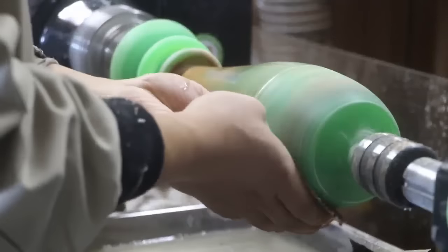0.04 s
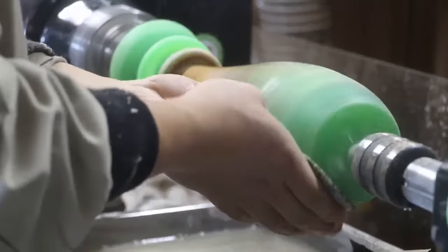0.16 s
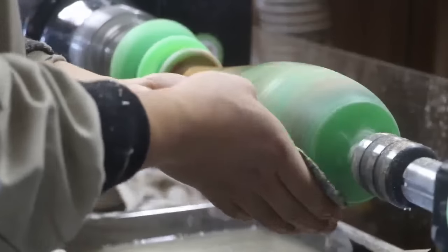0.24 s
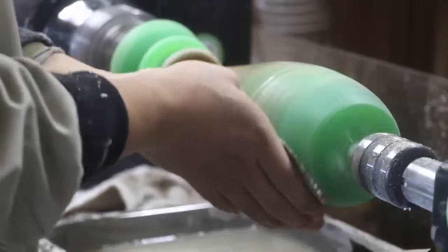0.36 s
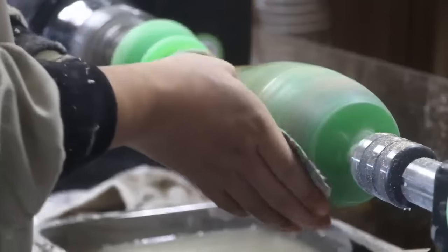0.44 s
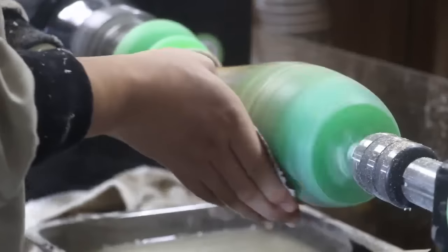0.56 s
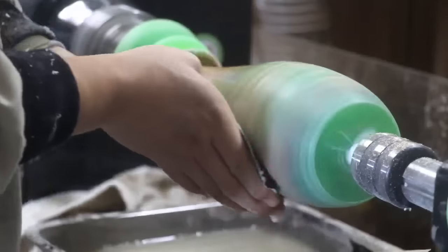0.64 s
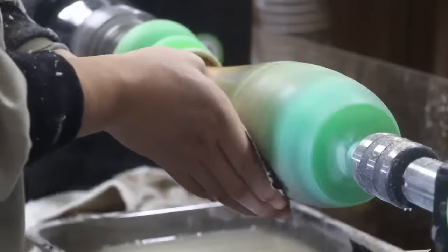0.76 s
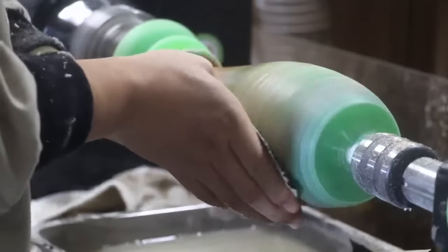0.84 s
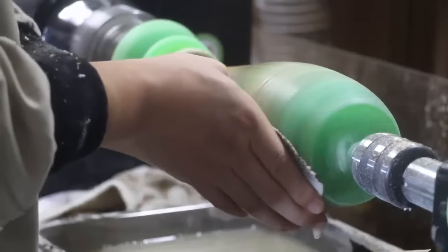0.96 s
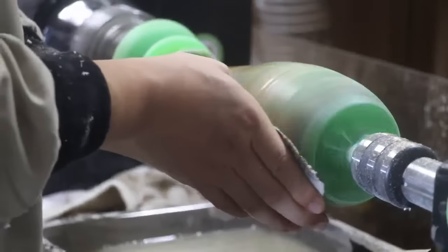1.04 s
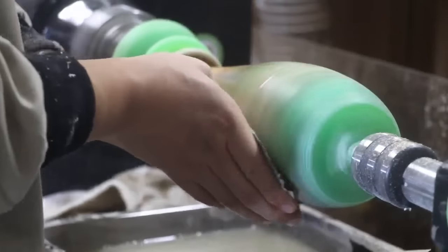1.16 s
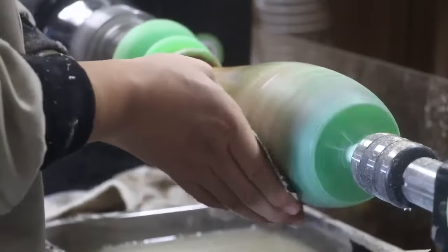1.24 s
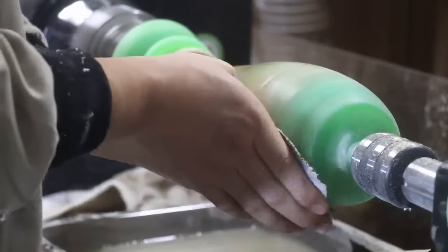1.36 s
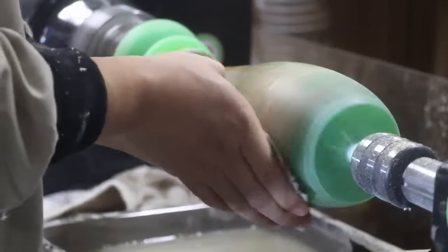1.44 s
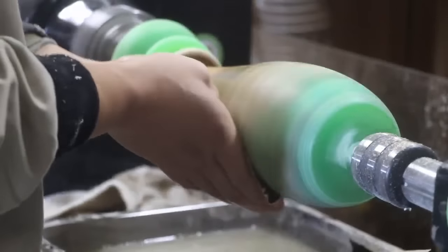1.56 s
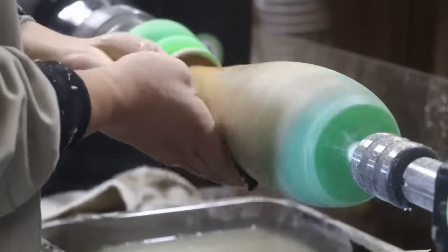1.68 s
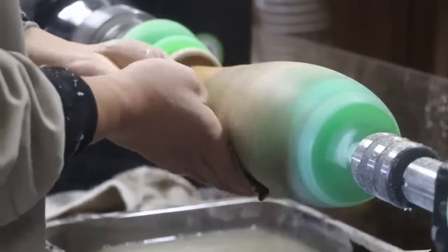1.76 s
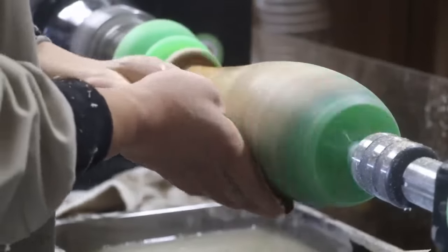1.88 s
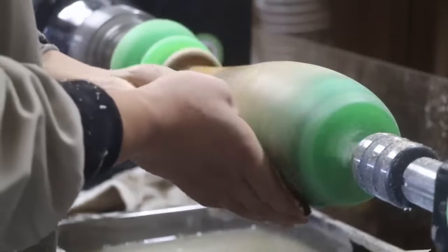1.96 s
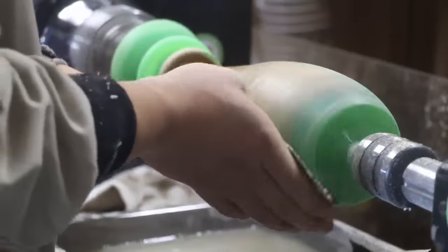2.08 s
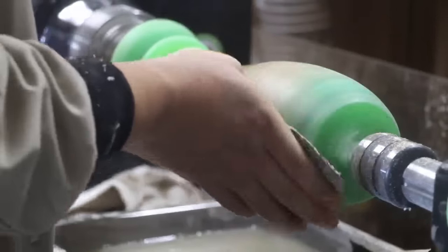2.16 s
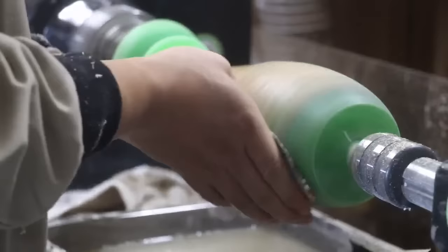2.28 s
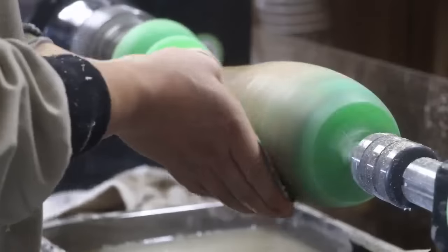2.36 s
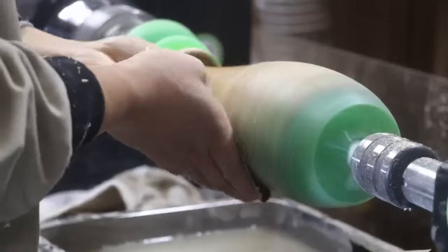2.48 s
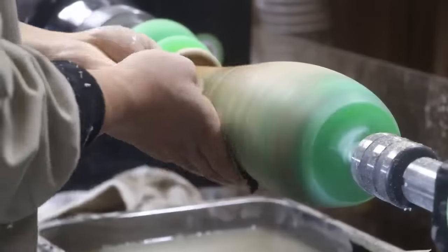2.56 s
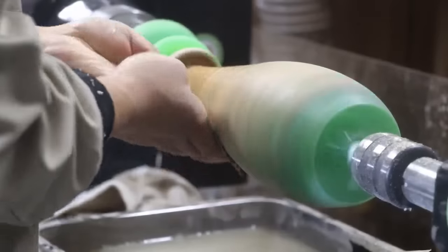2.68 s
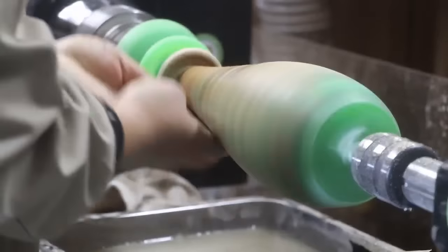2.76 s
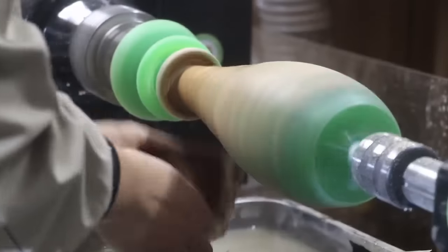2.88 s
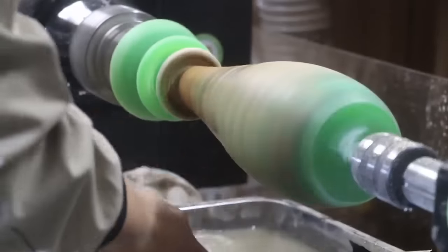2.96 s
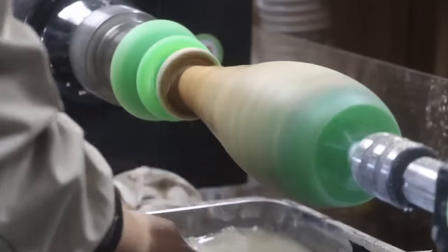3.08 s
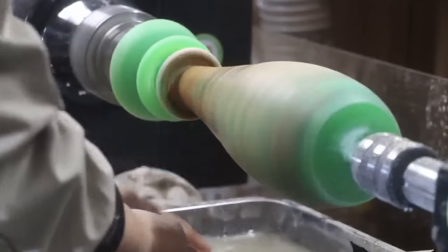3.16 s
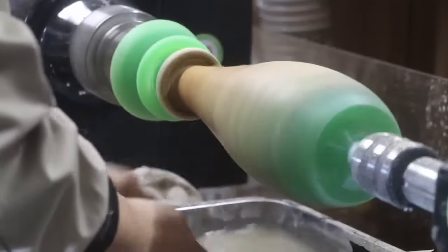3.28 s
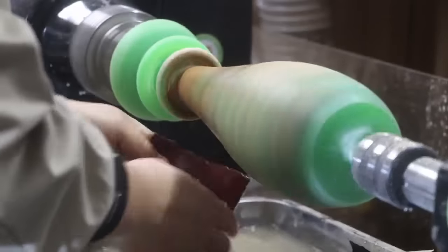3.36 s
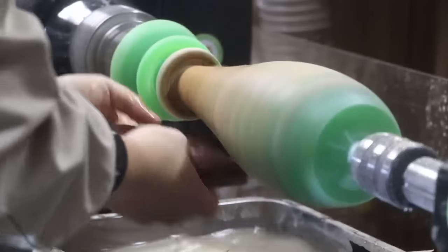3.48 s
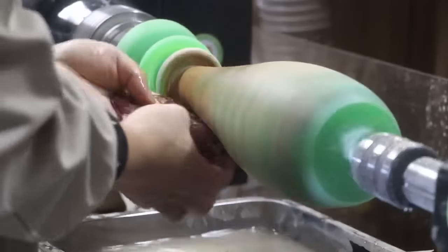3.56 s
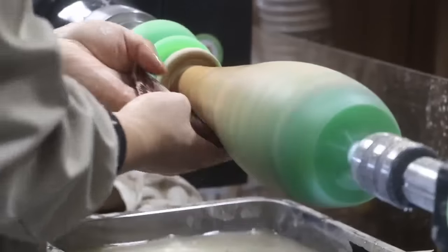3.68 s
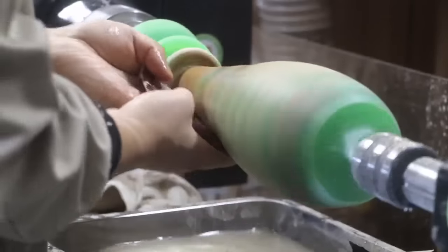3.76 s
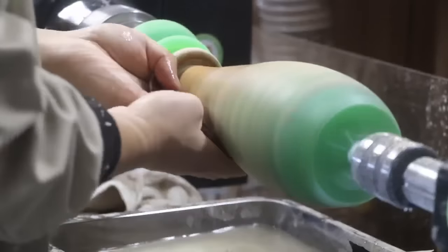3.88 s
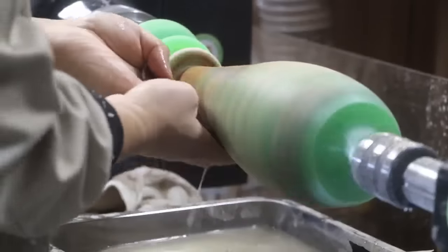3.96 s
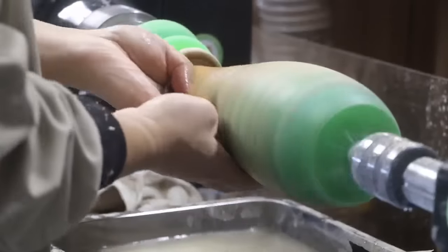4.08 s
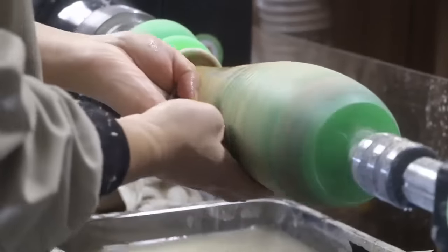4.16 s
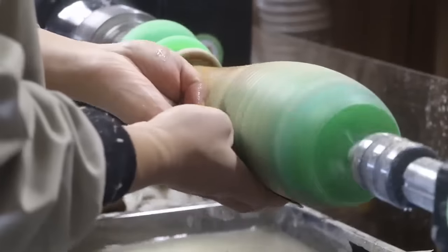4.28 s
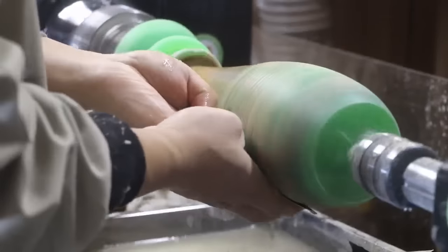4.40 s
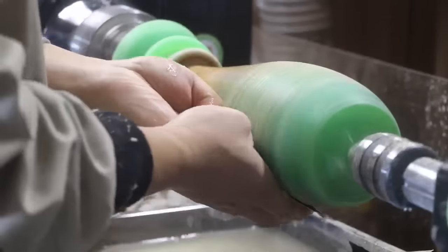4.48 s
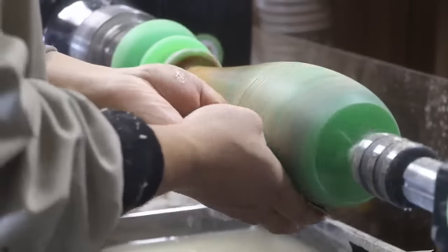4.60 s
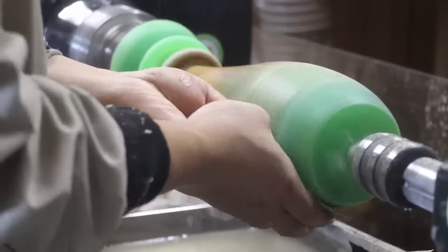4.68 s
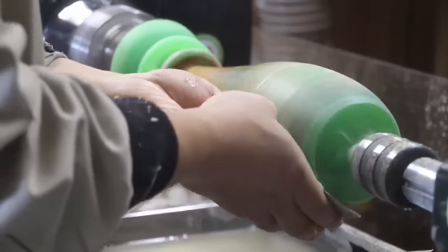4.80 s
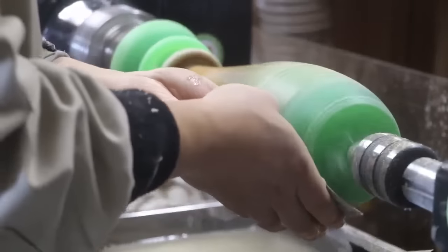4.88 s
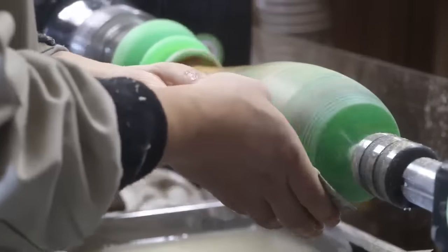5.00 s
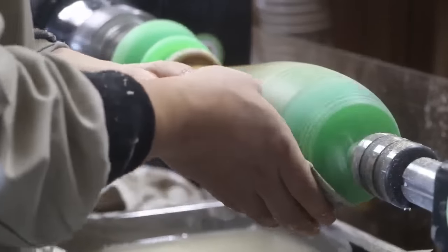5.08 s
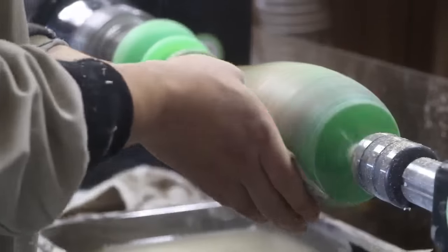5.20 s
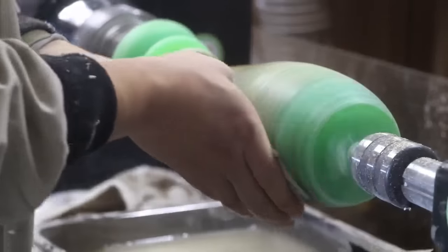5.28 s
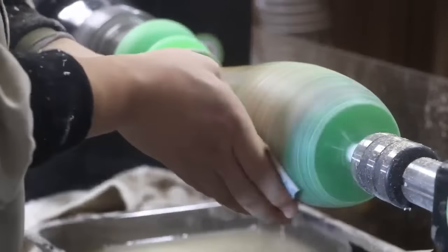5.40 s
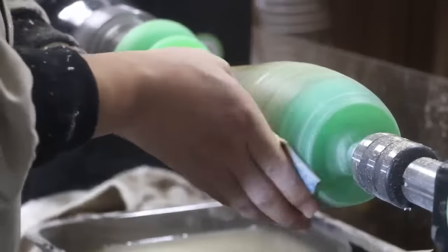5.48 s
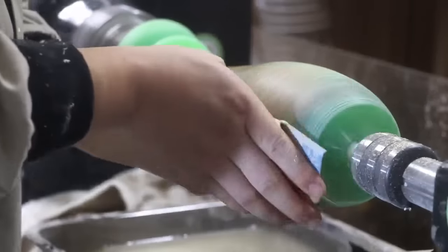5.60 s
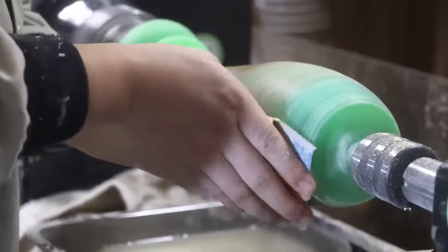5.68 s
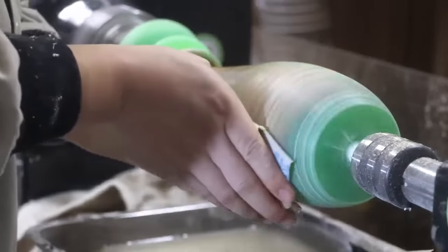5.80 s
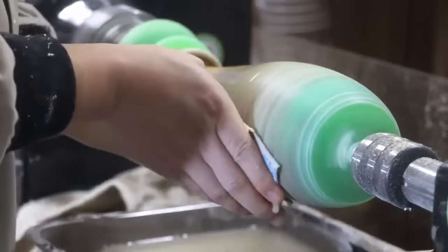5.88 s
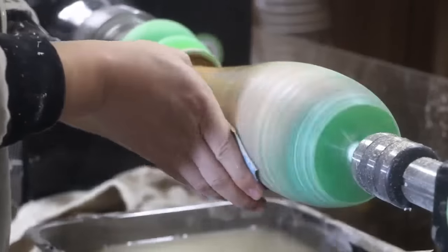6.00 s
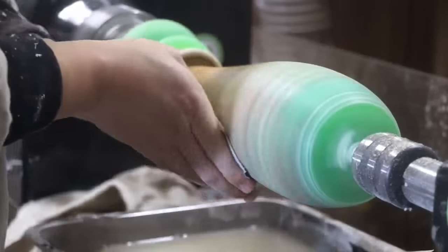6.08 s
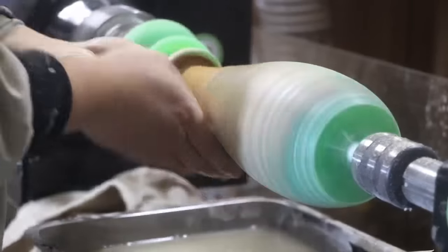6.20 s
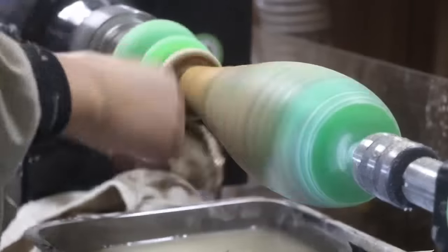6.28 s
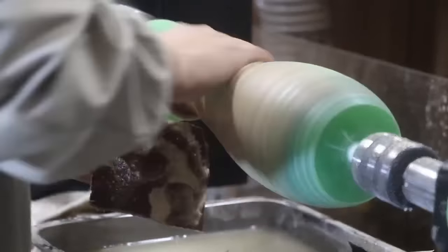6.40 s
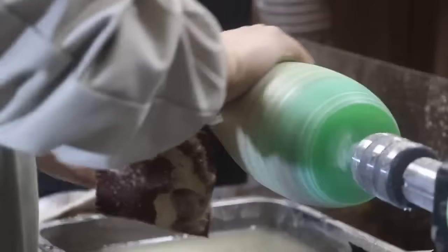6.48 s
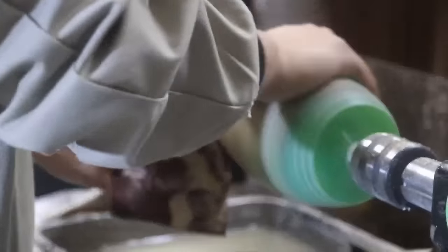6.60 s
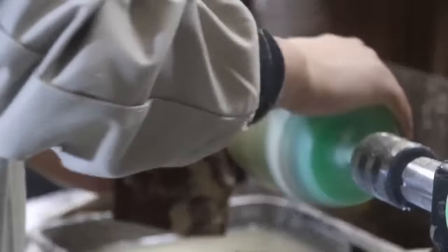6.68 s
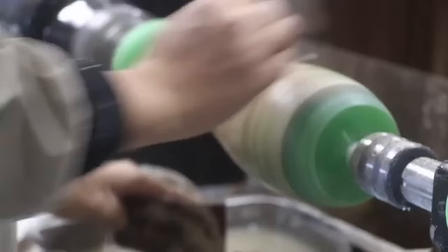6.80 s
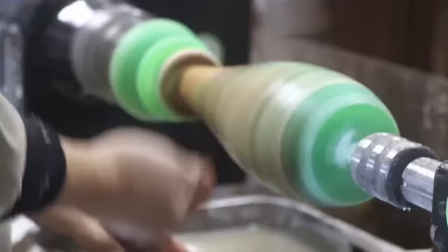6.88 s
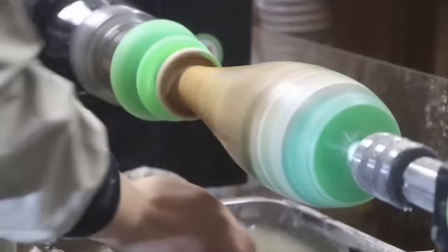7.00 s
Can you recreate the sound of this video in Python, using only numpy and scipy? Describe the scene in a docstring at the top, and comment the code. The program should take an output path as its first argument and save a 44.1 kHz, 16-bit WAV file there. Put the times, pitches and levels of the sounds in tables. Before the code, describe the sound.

A lathe hums and whirrs faintly while wet abrasive paper scrapes a rotating vase, close to the microphones. The bright, nasal hiss wavers with hand pressure and rotation, broken by gritty rasps, a sharp snap and hoarse little squeals. It drops suddenly to near quiet with watery swishing and a squeak, resumes darker for a second long stroke, and ends with a much softer palm slide. Short workshop reflections follow the snaps and squeaks.

```python
"""Wet sandpaper is pressed against a spinning vase of wood and resin: grit hisses and bites (filtered grains),
the paper rings and snaps (resonances, bursts) and squeals (sinking tones) under the cupped hand. The paper
lifts, and the wet surface swishes (granular noise), squeaks and ticks (bursts); then a second stroke follows.
At the end a bare palm wipes the piece (granular noise). Throughout, the lathe hums in mains harmonics, rumbles
and whirrs in shaped noise; thin steady tones sound during the strokes, and low flutter comes in spells."""
import sys
import numpy as np
from scipy import signal
from scipy.fft import rfft, irfft
from scipy.io import wavfile

SR = 44100
rng = np.random.default_rng(int(sys.argv[2]) if len(sys.argv) > 2 else 0)


def unload_wav(signal):
    """Save mono or channel-first audio to the path in sys.argv[1] as 16-bit WAV at rate SR, clipped to [-1, 1]."""
    wavfile.write(
        sys.argv[1],
        SR,
        np.round(np.clip(np.atleast_2d(signal).T, -1, 1) * 32767).astype(np.int16),
    )


N = 310905
T = np.arange(N) / SR
MAINS_HZ = 50
TOUCH_S = 0.005  # time constant with which the strokes' sounds come and go

# paper pressed on the piece: (start [s], end [s], rotation [turns/s], first meeting with the high spot [s])
STROKE_TIMES = [(0.0, 2.856, 11.24, .041), (3.633, 6.356, 11.14, 3.666)]
# the hand at work, one curve a stroke:
# (time [s], pressure as relative hiss level [dB], relative paper ring level [dB], paper resonance [Hz])
HAND_CURVES = [
    [(0.0, -38.5, -31.5, 2030), (0.36, -39.5, -36.5, 1910), (0.58, -39, -35, 2040),
     (0.68, -41.5, -35, 2200), (0.88, -40, -33, 1920), (1.0, -39.5, -44, 2150), (1.14, -40.5, -47, 2170),
     (1.42, -40.5, -40, 2080), (1.51, -40, -37.5, 2130.0), (1.63, -37, -30, 2160), (1.85, -37, -34, 2120),
     (2.02, -41.0, -36.5, 2190.0), (2.12, -42.5, -44.5, 2100.0), (2.3, -39.5, -40, 2110),
     (2.5, -41.5, -31.5, 2160), (2.6, -38.5, -27, 2210), (2.7, -39, -36.5, 2080),
     (2.86, -40.5, -33.5, 2150.0)],
    [(3.63, -37.5, -37, 1800.0), (3.765, -39, -50, 1550), (3.795, -37, -38, 1710), (4.25, -38.0, -37, 1580),
     (4.45, -37.5, -35, 2180), (4.66, -40.5, -35.5, 1520), (4.82, -35.5, -35.5, 1680),
     (4.88, -42, -45, 1700), (4.96, -37.5, -35, 1630), (5.11, -40.0, -41, 1960), (5.44, -39.5, -34.5, 1490),
     (5.63, -41, -33, 1870), (5.74, -40.5, -51, 1880.0), (6.15, -38.5, -27.5, 1910), (6.36, -39, -35, 2000)],
]
# the hand cupping the paper, one curve a stroke: (time [s], lowest radiated frequency [Hz],
# upper resonance relative to pressure [dB], level of the shaken wood [dB], upper resonance [Hz])
CUP_CURVES = [
    [(0, 1660, -4.5, -52.5, 2660), (.9, 1670, -1, -53.5, 3200), (1.4, 1580, -5.5, -52.5, 3270),
     (1.75, 1660, 4.5, -52, 3100), (2.28, 1790, -4.5, -59, 3220), (2.6, 1650, 6, -57, 3050),
     (2.86, 1740, 0, -59.5, 2920)],
    [(3.63, 1470, 0.5, -55.5, 3060), (3.95, 1630, 1, -58.5, 3300), (4.35, 1560, -4, -55, 2950),
     (4.85, 1415, -22, -50.5, 3000), (5.4, 1440, 0, -50.5, 3000), (5.85, 1450, -1.5, -51.5, 2930),
     (6.18, 1030, 7, -48, 3130), (6.36, 1530, 0, -52, 2970)],
]
# spectrum of the scraping grit: (frequency [Hz], relative density [dB/Hz])
GRIT_SPECTRUM = [(1500, 1.5), (2500, 0), (3150, -3), (3700, -1), (4200, -3.5), (4700, -3.5), (5300, -3),
                 (5900, -3), (6500, -4.5), (7300, -10.5), (8000, -21), (8700, -23), (9400, -32),
                 (10000, -63)]


def sanding(width_hz=480, upper_width_hz=540, sing_gain=.8, sing_width_hz=80, skirt=14, leak_db=-24,
            hiss_db=4.5, ring_db=-3.5, upper_db=-0.5, frame=512):
    """Source-filter principle: scraping grains excite the paper's modes, and the cupped hand high-passes them."""
    grit = through_vase(pair(grains(7000, 2.44, 0.73)))
    flutter = through_vase(pair(grains(2400, 0.98, 0.99)))
    # coarse grains break loose with sharp ticks, about 70 a second
    grit = grit + .2 * grains(70, 1.2, 0)[0] * amp([[-2], [2]])
    out = np.zeros((2, N))
    for (start, end, turn_hz, high_spot), hand, cup in zip(STROKE_TIMES, HAND_CURVES, CUP_CURVES):
        grip = chatter(turn_hz, high_spot)
        hz, t, scrape = signal.stft(grit * grip, SR, nperseg=frame)
        slaps = signal.stft(flutter * grip, SR, nperseg=frame)[2]
        f = hz[:, None] + 1
        pressure_db = follow(hand, t, axis=1)
        paper_hz = follow(hand, t, axis=3)
        # the gap under the hand lets out mainly sound above its own pitch
        leak = amp(leak_db) * f / (f + 300)
        radiated = leak + 1 / np.sqrt(1 + (follow(cup, t, axis=1) / f) ** skirt)
        hiss = levelled(amp(read(GRIT_SPECTRUM, f)) * radiated, pressure_db + hiss_db)
        # the tightest patch of paper sings, narrowly and unsteadily, inside the broad mode
        drift = 1 + .012 * np.interp(t, T, wander(6))
        lower = hump(f, paper_hz, width_hz) + sing_gain * hump(f, paper_hz * drift, sing_width_hz)
        lower = levelled(lower * radiated, ring_db + follow(hand, t, axis=2))
        upper = hump(f, follow(cup, t, axis=4), upper_width_hz)
        upper = levelled(upper, pressure_db + upper_db + follow(cup, t, axis=2))
        spectrum = scrape * hiss + slaps * np.hypot(lower, upper)
        stroke = signal.istft(spectrum, SR, nperseg=frame)[1][:, :N]
        out += stroke * contact(start, end, TOUCH_S, TOUCH_S)
    return out


# short rasps as the grit bites in: (start [s], end [s], jump of the grip before evening [dB])
BITE_TIMES = [(0.113, 0.184, 2), (0.308, 0.32, 2.5), (0.487, 0.502, 4), (0.634, 0.665, 4.5),
              (0.798, 0.844, 3), (1.012, 1.017, 5.5), (1.054, 1.082, 2.5), (1.189, 1.243, 3.5),
              (1.366, 1.446, 4), (2.063, 2.167, 4.5), (2.574, 2.64, 1), (2.748, 2.776, 2.5),
              (3.64, 3.667, 2), (3.789, 3.857, 1.5), (3.955, 3.976, 1.5), (4.558, 4.571, 2),
              (4.64, 4.662, 3), (5.094, 5.152, 3), (5.273, 5.323, 3.5), (5.532, 5.564, 4),
              (5.638, 5.642, 4.5), (5.831, 5.875, 3), (5.981, 6.015, 2.5), (6.313, 6.32, 2.5)]


def chatter(turn_hz, high_spot, turn_db=0.47, hand_db=0.44, hand_hz=30, ripple_db=-0.14,
            bite_rise_s=0.0058, bite_fall_s=0.023):
    """Amplitude modulation: the grip swells once a turn, bites, trembles with the hand, ripples with the motor."""
    turn = np.cos(2 * np.pi * turn_hz * (T - high_spot))
    bites = sum(db * contact(start, end, bite_rise_s, bite_fall_s) for start, end, db in BITE_TIMES)
    ripple = np.sin(2 * np.pi * MAINS_HZ * T)
    tremble = hand_db * wander(hand_hz)
    return evened(amp(turn_db * turn + bites + tremble + ripple_db * ripple))


# modes of the vase and notches between them: (frequency [Hz], width [Hz], boost or cut [dB])
VASE_MODES = [(1197, 64, 7), (1430, 54, 4.5), (1700, 78, 1.5), (1930, 45, 1.5), (2070, 40, 0.5),
              (2265, 41, 2.5), (2340, 37, 1), (2840, 60, 1.5), (2920, 50, 1), (3120, 40, -2.5),
              (3240, 50, 2.5), (3400, 84, 1), (3930, 64, 3), (4230, 70, 5), (5880, 170, 3), (6270, 90, 1)]


def through_vase(x, size=4096):
    """Modal resonance: the vase's own narrow modes stand out of whatever rubs on it."""
    f = np.fft.rfftfreq(size, 1 / SR)
    gain = amp(sum(db * hump(f, hz, width) for hz, width, db in VASE_MODES))
    fine_gain = np.interp(np.fft.rfftfreq(N, 1 / SR), f, gain)
    return evened(irfft(rfft(x) * fine_gain, N))


# spectrum of the shaken wood: (frequency [Hz], relative density [dB/Hz])
WOOD_SPECTRUM = [(50, -51.5), (85, -23), (150, -3.5), (220, -3.5), (420, 0), (560, -1.5), (780, 3),
                 (1100, -1), (2000, -30)]


def workpiece(release_s=0.003):
    """Structure-borne sound: the drag of the paper shakes the wood itself, a dull rush under the hiss."""
    level = sum(amp(follow(cup, T, axis=3)) * contact(start, end, TOUCH_S, release_s)
                for (start, end, *_), cup in zip(STROKE_TIMES, CUP_CURVES))
    return pair(colour(noise(), WOOD_SPECTRUM), left_db=0.9) * level


# sinking stick-slip tones of the paper: (start [s], end [s], nominal level [dB], starting pitch [Hz])
SQUEAL_TONES = [(0.658, 0.758, -40.5, 2175), (0.803, 0.849, -35, 2013), (.918, 0.953, -41, 1886),
                (3.708, 3.76, -39, 1438), (3.789, 3.86, -41.5, 1793), (3.997, 4.038, -37.5, 1720),
                (4.655, 4.675, -38, 1650), (4.786, 4.812, -40, 1422), (5.1, 5.148, -39, 1893)]


def squeals(sag_per_s=.5, waver=0.026, waver_hz=170, rough_db=3.5, edge_s=0.004, left_db=-6.5):
    """Stick-slip oscillation: the wet paper grabs and lets go in a hoarse, narrow tone that sinks as it lasts."""
    unsteady, out = 1 + waver * wander(waver_hz), 0
    for start, end, db, hz in SQUEAL_TONES:
        sag = 1 - sag_per_s * (np.clip(T, start, end) - start)
        phase = 2 * np.pi * np.cumsum(hz * unsteady * sag) / SR
        out = out + amp(db) * contact(start, end, edge_s, edge_s) * np.sqrt(2) * np.sin(phase)
    roughness = evened(amp(rough_db * wander(waver_hz)))
    return out * roughness * amp([[left_db / 2], [-left_db / 2]])


# the paper catches and snaps: (time [s], nominal peak level [dB], pitch [Hz], length [s])
PAPER_SNAPS = [(.4928, -27, 2020, 0.0028), (.6322, -24.5, 2250, .0035), (.6508, -27, 2050, .003),
               (.6526, -14.7, 2270, .0024), (2.5391, -34, 2270, .002), (3.645, -27, 2285, 0.014),
               (5.5334, -27, 1730, 0.0042), (5.6327, -27, 1800, 0.0047), (6.162, -24, 1310, 0.0043),
               (6.318, -25, 1790, 0.0085)]
# wet squeaks, and a sharp tick at 3.44 s, between the strokes: (time [s], nominal peak level [dB], pitch [Hz],
# length [s])
WET_SQUEAKS_AND_TICK = [(3.1062, -45, 1720, 0.0073), (3.1110, -27.5, 2050, 0.0033), (3.112, -35, 1706, .007),
                        (3.1175, -38, 2200, 0.0059), (3.1222, -33, 1940, 0.0041), (3.4396, -48, 3730, 0.0067),
                        (3.4396, -37.5, 2960, 0.0053), (3.4414, -39, 1800, 0.00033), (3.4412, -48, 4460, 0.00034),
                        (3.4595, -46, 2900, 0.0044), (3.475, -53, 2980, 0.0069)]


def slips(rows, left_db, rasp, room_db, t60):
    """Transient stick-slip: short bursts with uneven cycles, followed by the decaying ring of the workshop."""
    dry, jitter = np.zeros(N), rasp * wander(550)
    for s, db, hz, length in rows:
        u = np.clip(2 * (T - s) / length, 0, 10)
        envelope = u ** 2 * np.exp(1 - u ** 2)
        dry += amp(db) * envelope * np.sin(2 * np.pi * hz * (T - s) + jitter)
    # so small a patch radiates little bass
    dry = signal.sosfilt(signal.butter(4, 1150, "high", fs=SR, output="sos"), dry)
    tail = noise(channels=2)[:, :SR // 2] * amp(-60 * T[:SR // 2] / t60)
    room = signal.fftconvolve(dry[None], tail / np.linalg.norm(tail[0]), axes=1)[:, :N]
    return (dry + amp(room_db) * room) * amp([[left_db / 2], [-left_db / 2]])


# water swishing while the paper is off: (start [s], end [s], relative level before sagging [dB])
SWISH_TIMES = [(2.86, 2.895, -48.5), (3.11, 3.265, -48), (3.33, 3.39, -63), (3.42, 3.49, -51.5),
               (3.61, 3.63, -52)]
# spectrum of the swishing water film: (frequency [Hz], relative density [dB/Hz])
FILM_SPECTRUM = [(88, -44), (150, -20.5), (272, -12.5), (900, -15.5), (1800, -9.5), (2200, -5), (2480, -8),
                 (3400, -9), (5500, -20), (6500, -20.5), (9810, -50)]
# the palm sliding on the wet piece: (start [s], end [s], relative level before sagging [dB])
WIPE_TIMES = [(6.37, 6.52, -66), (6.56, 6.835, -51.5), (6.97, 7.05, -62)]
# spectrum of the sliding palm: (frequency [Hz], relative density [dB/Hz])
PALM_SPECTRUM = [(71, -29), (120, -7), (220, -12.5), (400, -11), (900, -12.5), (1600, -8), (3100, -8.5),
                 (4050, -11), (4520, -14), (5900, -10.5), (7310, -19), (9810, -44)]


def wet_rub(rows, spectrum, level_db, left_db, rough_db, rise_s, fall_s, sag_db_per_s):
    """Granular friction noise: water dragged over the surface swells, sags as the film thins, and fades."""
    fizz = pair(colour(grains(6000, 1.1, 1.3), spectrum), left_db)
    fizz = fizz * evened(amp(rough_db * wander(150)))
    power = 0
    for start, end, db in rows:
        sag_db = sag_db_per_s * (np.clip(T, start, end) - start)
        power = power + (amp(level_db + db - sag_db) * contact(start, end, rise_s, fall_s)) ** 2
    return fizz * np.sqrt(power)


# hum, mostly stronger during the strokes and fainter between them:
# (frequency [Hz], nominal rms during strokes [dB], nominal rms between strokes [dB])
HUM_LINES = [(100, -83, -88), (200, -78, -84), (250, -73, -80), (300, -80, -81), (400, -72, -85),
             (900, -73, -85), (1000, -75, -85), (1500, -79, -81)]
# shaking of the lathe bed: (time [s], relative level [dB])
RUMBLE_CURVE = [(0, -68), (1.8, -64.5), (2.3, -72.5), (3.92, -77), (4.01, -60), (4.8, -55), (5.33, -60),
                (5.5, -65.5), (5.8, -61), (6.33, -52.5), (6.38, -64), (6.48, -65), (6.54, -60), (6.82, -57),
                (6.86, -63)]
# spectrum of the bed's rumble: (frequency [Hz], relative density [dB/Hz])
BED_SPECTRUM = [(20, -15), (40, -12.5), (52, -4.5), (65, -7), (85, -6.5), (100, -8.5), (118, -8.5),
                (200, -19), (500, -57)]
# spectrum of the bearings' whirr: (frequency [Hz], relative density [dB/Hz])
WHIRR_SPECTRUM = [(25, -1.5), (60, 0), (250, -1), (600, 1.5), (720, 4), (785, 1), (860, -4.5), (1500, 0),
                  (3300, -5), (6000, -12), (8000, -34), (10000, -65)]


def lathe(rumble_db=-9.0, drone_db=-11, drone_hz=100, waver_db=1.5, edge_s=0.012, whirr_db=-64.5):
    """Harmonic and broadband machine noise: mains hum, the bed's rumble and drone, the bearings' whirr."""
    in_stroke = sum(contact(start, end, edge_s, edge_s) for start, end, *_ in STROKE_TIMES)
    shake = amp(follow(RUMBLE_CURVE, T))
    hum = 0
    for hz, during_db, between_db in HUM_LINES:
        # the hum line next to the bed's resonance swells with its shaking
        drone = amp(drone_db) * shake * (abs(hz - drone_hz) < MAINS_HZ / 2)
        level = amp(between_db + (during_db - between_db) * in_stroke)
        hum = hum + (level + drone) * mains_tone(hz)
    rumble = amp(rumble_db) * shake * pair(colour(noise(), BED_SPECTRUM), apart_db=3.5)
    whirr = pair(colour(noise(), WHIRR_SPECTRUM), left_db=0.5, apart_db=-10.0) * amp(whirr_db)
    return hum * amp(waver_db * wander(2.0)) + rumble + whirr


def mains_tone(hz):
    """Harmonic locking: a tone with an rms of one at the nearest multiple of the mains frequency."""
    locked_hz = MAINS_HZ * round(hz / MAINS_HZ)
    return np.sqrt(2) * np.sin(2 * np.pi * (locked_hz * T + rng.random()))


# thin steady tones heard during the sanding strokes: (frequency [Hz], nominal rms [dB])
THIN_TONES = [(784, -71.5), (1265, -63.5), (5599, -64), (6000, -64.5), (6551, -67), (7984, -80.5),
              (8017, -80.5)]


def whine(waver_db=-2.0):
    """Sum of pure tones: thin, steady pitches with a slowly wavering level, heard during the strokes."""
    in_stroke = sum(contact(start, end, TOUCH_S, TOUCH_S) for start, end, *_ in STROKE_TIMES)
    tones = sum(amp(db) * np.sqrt(2) * np.sin(2 * np.pi * hz * T) for hz, db in THIN_TONES)
    return in_stroke * amp(waver_db * wander(2)) * tones


# spells of low flutter: (start [s], end [s], level [dB])
FLUTTER_SPELLS = [(4.01, 4.07, -69), (4.76, 4.9, -62), (5.83, 6.348, -58)]


def buffet(centre_hz=80, width_hz=16, swell_s=.03):
    """Antiphase narrow-band noise: a low flutter in spells, of opposite sign in the two channels."""
    f = np.fft.rfftfreq(N, 1 / SR)
    flutter = evened(irfft(rfft(rng.standard_normal(N)) * hump(f, centre_hz, width_hz), N))
    level = sum(amp(db) * contact(start, end, swell_s, swell_s) for start, end, db in FLUTTER_SPELLS)
    return np.outer([1, -1], flutter * level)


# likeness of the two microphones: (frequency [Hz], shared fraction of the power [0-1])
LIKENESS = [(60, 0.5), (200, 0.52), (400, 0.62), (1000, 0.6), (2000, 0.39), (4000, 0.38), (9000, 0.41)]
# balance of the two microphones: (frequency [Hz], left minus right before any source's own shift [dB])
BALANCE = [(60, -3.5), (140, -0.5), (320, -1.5), (750, -3), (1740, -7.5), (4030, -6.5), (9360, -5)]


def pair(three, left_db=0, apart_db=0):
    """Partial coherence: mixes one shared and two separate signals into two microphones."""
    hz = np.fft.rfftfreq(N, 1 / SR)
    z, same = rfft(three), np.clip(read(LIKENESS, hz), 0, 1)
    lean = amp(np.outer([.5, -.5], read(BALANCE, hz) + left_db))
    both = (np.sqrt(same) * z[0] + amp(apart_db) * np.sqrt(1 - same) * z[1:]) * lean
    return irfft(both / np.sqrt(((lean ** 2).sum(0) + 2 * same) / 4), N)


def grains(per_s, spread_db, smooth, channels=3):
    """Shot noise: random tiny impacts of uneven size over a bed of smooth noise."""
    size = amp(spread_db * np.minimum(rng.exponential(1, (channels, N)), 4))
    hits = size * np.sign(noise(channels)) * (rng.random((channels, N)) < per_s / SR)
    return evened(evened(hits) + smooth * noise(channels))


def noise(channels=3):
    """White noise: independent random samples in each channel."""
    return rng.standard_normal((channels, N))


def wander(hz):
    """Band-limited random modulation: smooth chance with an rms of one, mostly up to about hz."""
    ratio = np.fft.rfftfreq(N, 1 / SR) / hz
    return evened(irfft(rfft(rng.standard_normal(N)) * ratio / (1 + ratio ** 2) ** 2, N))


def contact(start, end, rise, fall):
    """Exponential envelope: one while a touch lasts, swelling before it and dying away after it."""
    return np.exp(-np.clip(np.maximum((start - T) / rise, (T - end) / fall), 0, 20))


def hump(f, centre, width):
    """Resonance curve: the gain of one mode."""
    return (1 + ((f - centre) / width) ** 2) ** -1.4


def levelled(gains, db):
    """Power normalization: scales each frame of a filter by its mean square gain to the level db."""
    return gains * amp(db) / np.sqrt((gains ** 2).mean(0))


def colour(x, points):
    """Spectral shaping: gives a signal a fixed spectrum, at an rms of one."""
    return evened(irfft(rfft(x) * amp(read(points, np.fft.rfftfreq(N, 1 / SR))), N))


def read(points, hz):
    """Logarithmic frequency scale: interpolates a spectrum table along it."""
    f, value = np.transpose(points)
    return np.interp(np.log(hz + 1), np.log(f + 1), value)


def follow(rows, t, axis=1):
    """Linear interpolation: reads one column of a curve at the times t."""
    rows = np.asarray(rows)
    return np.interp(t, rows[:, 0], rows[:, axis])


def evened(x):
    """Root-mean-square normalization: scales to an rms of one."""
    return x / np.sqrt(np.mean(x ** 2) + 1e-20)


def amp(db):
    """Decibel law: converts a level to an amplitude gain."""
    return 10 ** (np.asarray(db) / 20)


def scene():
    """Superposition: two sanding strokes, the wet pause and the final wipe, over the running lathe."""
    snaps = slips(PAPER_SNAPS, left_db=-6, rasp=0.4, room_db=-8, t60=.12)
    squeaks = slips(WET_SQUEAKS_AND_TICK, left_db=-8.0, rasp=0.34, room_db=-3.0, t60=0.2)
    swish = wet_rub(SWISH_TIMES, FILM_SPECTRUM, level_db=-4.0, left_db=2.5, rough_db=-0.5,
                    rise_s=0.038, fall_s=0.052, sag_db_per_s=10.5)
    wipe = wet_rub(WIPE_TIMES, PALM_SPECTRUM, level_db=0.4, left_db=0.0, rough_db=0.0,
                   rise_s=0.055, fall_s=0.019, sag_db_per_s=3.0)
    strokes = sanding() + workpiece() + snaps + squeals()
    wet_surface = squeaks + swish + wipe
    return strokes + wet_surface + lathe() + whine() + buffet()


def record(dry, edge_hz=9900, offset=.0013):
    """Band limitation: a steep low-pass removes the top treble, and a slight constant offset is added."""
    edge = signal.firwin(401, edge_hz, window=("kaiser", 9), fs=SR)
    return signal.oaconvolve(dry, edge[None], "same") + offset


dry = scene()
out = record(dry)
unload_wav(out)
```